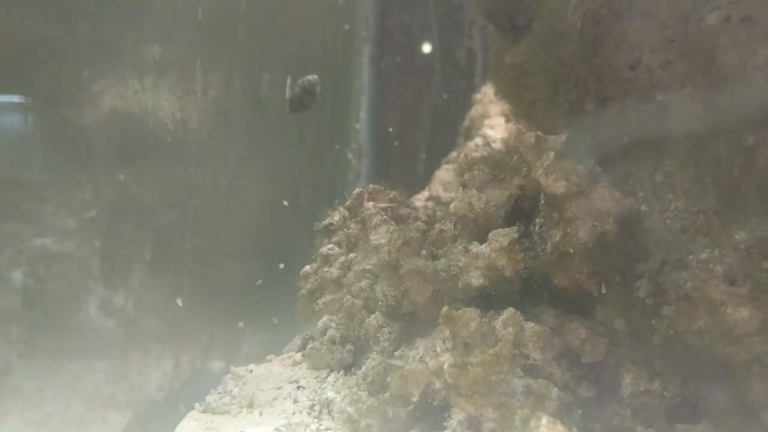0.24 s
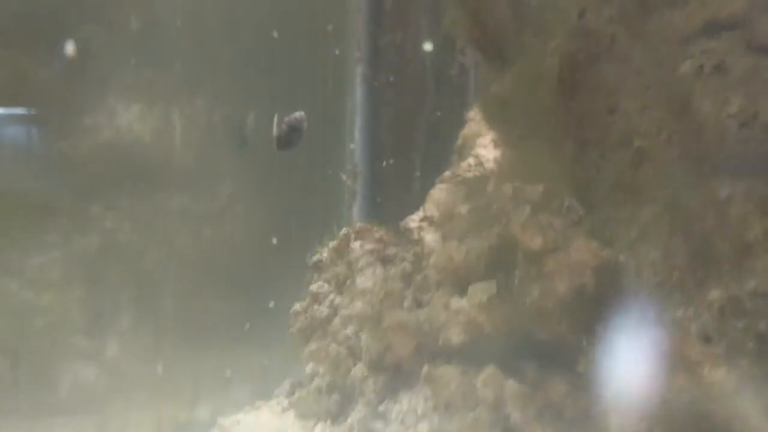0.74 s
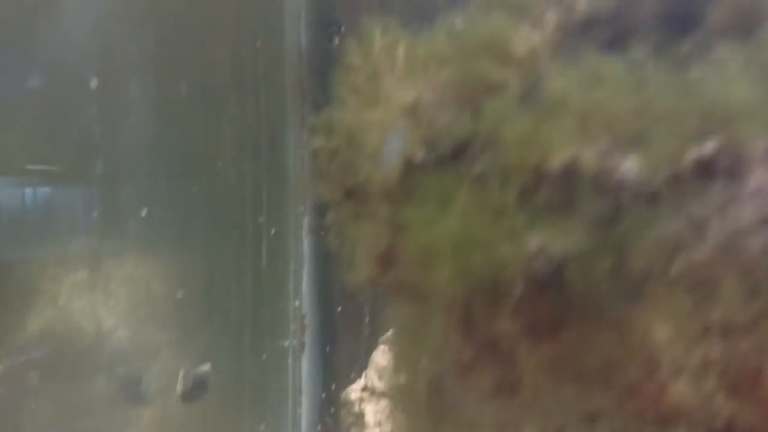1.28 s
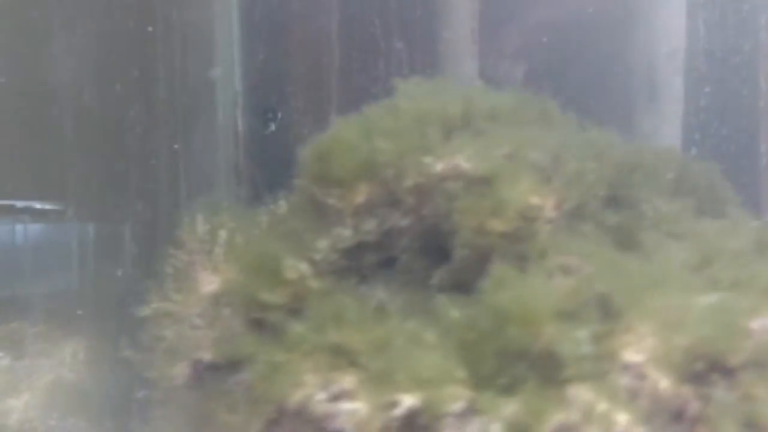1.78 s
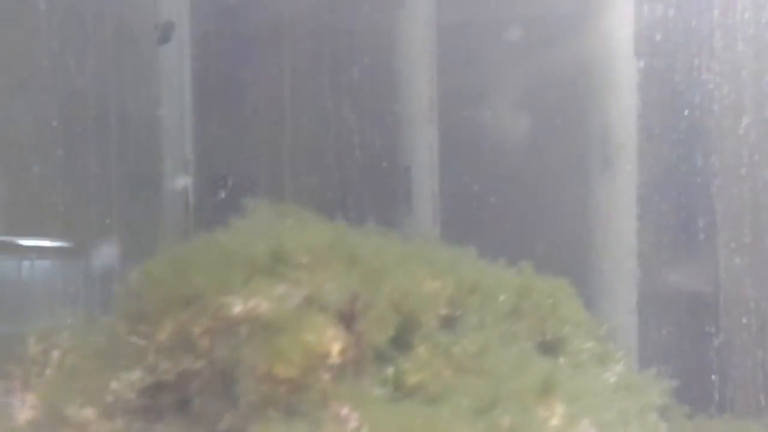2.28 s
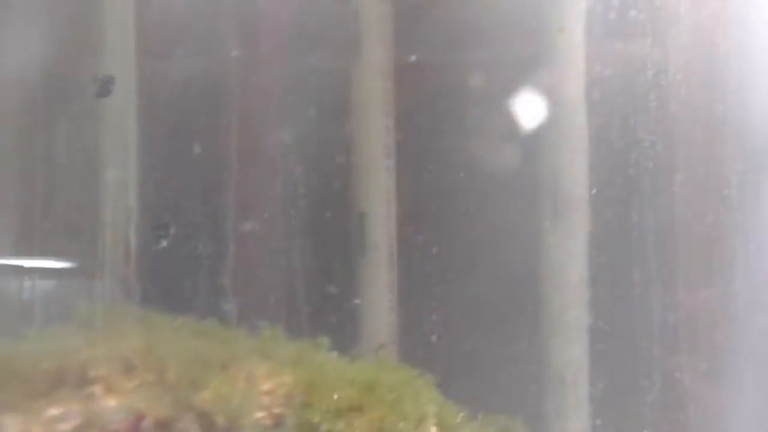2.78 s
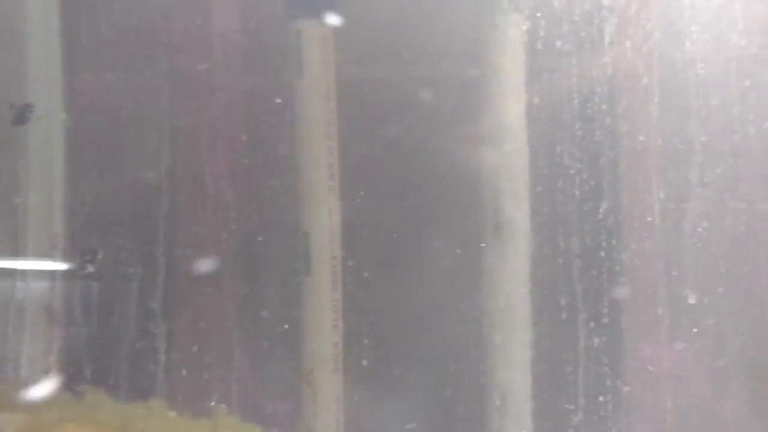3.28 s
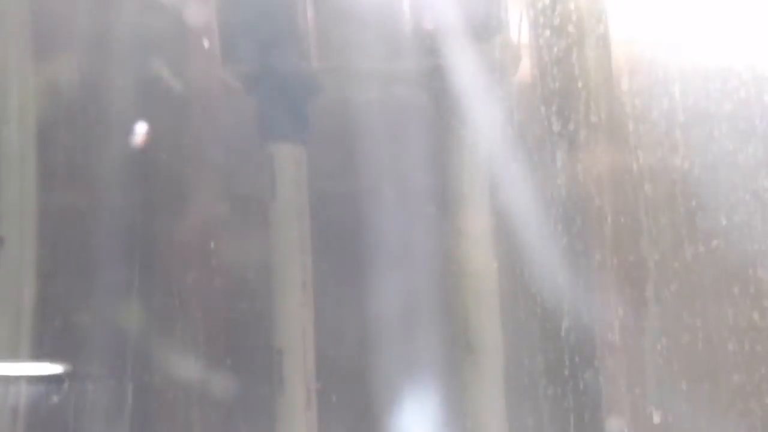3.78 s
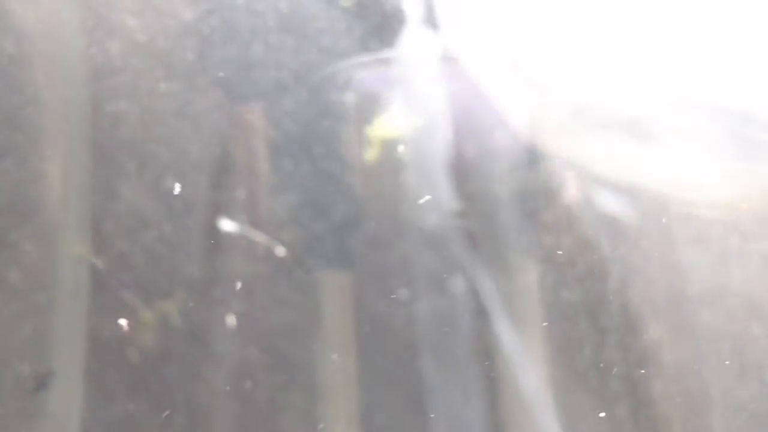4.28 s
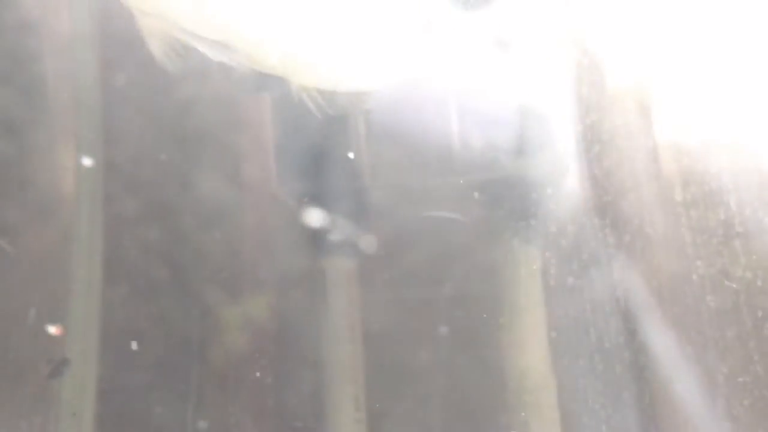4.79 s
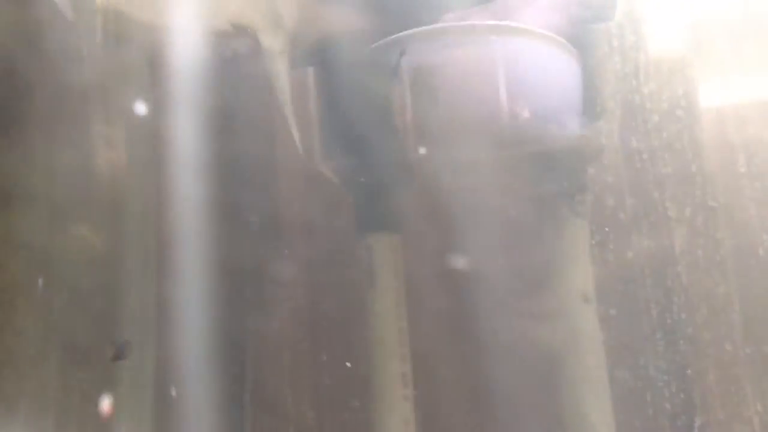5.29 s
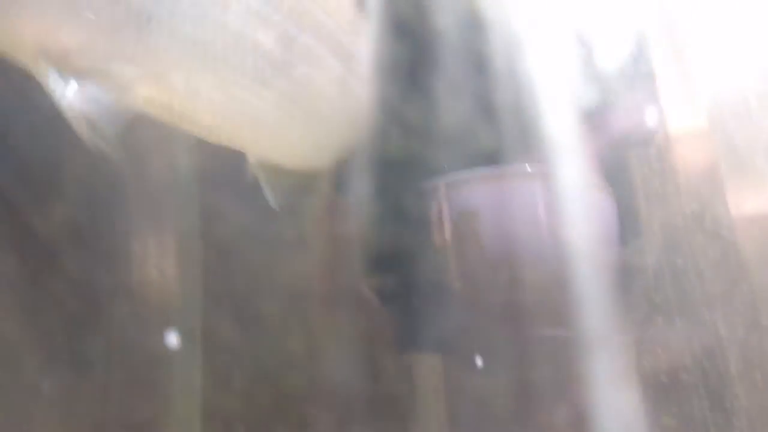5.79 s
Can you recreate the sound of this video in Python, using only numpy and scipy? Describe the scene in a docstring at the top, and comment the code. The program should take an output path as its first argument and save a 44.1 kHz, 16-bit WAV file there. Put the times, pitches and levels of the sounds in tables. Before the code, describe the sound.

Close aquarium outflow burbles and hisses, one sharp knock rings the glass, then a low pump hum swells with squeaky drags along the pane.

```python
"""An aquarium pump hums through the tank glass, heard close by, on a camera that slides up along the pane.
Its tones (sines with chance wavering) swell as the camera closes in; the drags are gliding groans and squeaks.
One sharp knock, a noise crack over decaying tank tones, makes the gain control duck the level.
The outflow burbles and hisses as filtered noise; ringing bubbles, gulps, noise ticks and spitting drips
lie over it, and narrow drones stand in the room air. Two microphone ports hear it in stereo."""
import sys
import numpy as np
from scipy import signal
from scipy.fft import rfft, irfft
from scipy.io import wavfile
from scipy.ndimage import uniform_filter1d

SR = 44100
rng = np.random.default_rng(int(sys.argv[2]) if len(sys.argv) > 2 else 0)


def store_wav(level_fs):
    """Save 16-bit WAV to argv[1]."""
    pcm = np.round(np.clip(np.atleast_2d(level_fs), -1, 1) * 32767)
    wavfile.write(sys.argv[1], SR, pcm.T.astype(np.int16))


N = 266802
TIME = np.arange(N) / SR

# Pump overtones at a buzz strength of 0 dB, before standing waves and port tilt:
# (multiple of the hum, level [dB], unsteady share, level change per buzz strength [dB/dB])
PUMP_OVERTONES = [(2, -44.5, 0.36, 0.82), (3, -45, 0.46, 0.39), (4, -40, 0.11, 1.24),
                  (5, -41.5, 0.13, 1.43), (6, -56, 0.45, 0.22), (7, -49.5, 0.43, 1.7), (8, -58.5, .25, 0.1),
                  (9, -63, 0.36, 0.51), (10, -57, 0.41, 0.53), (11, -57.5, 0.14, 1.7),
                  (12, -60.5, 0.26, 0.7), (13, -65, 0.22, 0.5), (15, -56.5, 0.17, 3.2),
                  (17, -56.5, 0.39, 0.76)]
# Standing waves that the camera drifts through:
# (time [s], width [s], multiple of the hum, swell or dip [dB])
STANDING_WAVES = [(1.52, 0.13, 6, 12.5), (2.08, 0.18, 6, 13.5), (2.52, 0.37, 3, 6.5), (2.7, 0.38, 5, 2),
                  (2.95, 0.6, 4, -2), (3.15, .2, 3, -4), (3.5, .16, 4, 3.5), (3.55, 0.81, 12, 8),
                  (3.75, 0.53, 9, 9), (3.85, 0.14, 3, -19), (4, .2, 2, 5), (4.08, 0.11, 7, 10),
                  (4.1, 0.38, 10, 11.5), (4.25, 0.3, 13, 0), (4.65, 0.56, 11, 5), (5.75, .3, 8, 9)]
# Drones in the room air, at a buzz strength of -12 dB:
# (frequency [Hz], width [Hz], level [dB], lag of the right port [rad])
ROOM_DRONES = [(183.2, 3.2, -46.5, 2.5), (248.4, 1.56, -45.5, 1.5), (347.6, 16, -52, 2), (785, 6, -53, 1.3),
               (838, 9, -53.5, 0.86), (1142, 2.3, -56.5, -1.5), (6000, 110, -68, 4.5)]
# Likeness of the noise at the two ports: (frequency [Hz], likeness [0 to 1])
PORT_LIKENESS = [(50, .4), (130, .9), (260, .3), (600, .65), (1100, .98), (1750, .45), (2080, .99),
                 (2200, .9995), (2480, .9995), (2620, .98), (2900, .55), (3350, .95), (3650, .93),
                 (4100, .5), (4700, .75), (6000, .55), (8000, .5), (12000, .25), (15000, .2)]
# Phase by which the left port leads: (frequency [Hz], lead [rad])
PORT_LEAD = [(0, 0), (1200, .1), (1700, -1.2), (2080, -3), (2170, -3.14), (2500, -3.14), (2620, -3.35),
             (3100, -5.8), (3350, -6.25), (3700, -6.4), (4200, -8.6), (4900, -9.4), (5500, -11.7),
             (6050, -12.2), (6550, -14.2), (7250, -15.4), (9200, -20.6), (11800, -27), (15500, -35)]
# Level difference of the ports: (frequency [Hz], left minus right [dB])
PORT_TILT = [(60, -2), (200, -2.5), (400, -1), (1300, 0), (2600, 0), (3650, -.5), (4050, -4.5),
             (4900, -2.8), (6300, -8), (8000, -7), (15000, -6)]
# Loudest drips at the surface, before the port offset: (time [s], level [dB], centre frequency [Hz])
LOUD_DRIPS = [(.004, -47, 8000), (0.047, -44, 9000), (.286, -47, 8500), (0.33, -43, 6160),
              (.363, -46, 5700), (0.467, -42.5, 8820), (.6, -42, 10900), (.647, -51, 13500),
              (.865, -50, 6000), (.895, -51, 7000), (0.994, -47, 7500), (1.036, -42, 9000)]
# Low gulps of the outflow: (time [s], level [dB], starting pitch [Hz])
OUTFLOW_GULPS = [(0.085, -31, 329), (.165, -36, 347), (.295, -30.5, 348), (.565, -35.5, 327),
                 (.61, -32, 352.3), (0.744, -32.5, 333), (0.999, -36.5, 363), (3.029, -36, 262),
                 (3.11, -38, 300), (3.19, -27.5, 318), (3.22, -34, 670)]
# Camera drags on the pane, before slips, fades and port tilt: (time [s], length [s], groan level [dB],
# squeak level [dB], squeak pitch [Hz], whole glide of the squeak [Hz], upward curl of its ends [Hz])
PANE_DRAGS = [(1.99, 0.258, -33.5, -46.5, 838, -25, 0), (2.655, 0.16, -37, -40, 836, -25, 0),
              (2.865, 0.13, -38, -39, 838, -31, 0), (3.05, 0.146, -41, -39, 832, 58, 35),
              (3.195, 0.08, -40, -40, 802, 54, -6), (3.31, 0.08, -47, -40.5, 845, -5, 3),
              (3.52, 0.183, -47, -50, 838, 36, 10), (3.81, 0.17, -45, -40.5, 860, 78, -4),
              (4.08, 0.138, -42, -47, 866, 58, 0)]
# The knock and its chatter, relative levels:
# (time [s], crack level [dB], ring level [dB], brightness of the ring [dB/octave])
KNOCK_BLOWS = [(1.0725, -11, -30, 0), (1.0745, -3.5, 0, -1), (1.0805, -12, -8, 3), (1.085, -12, -16, 0)]
# Spectrum of the knock's noise: (frequency [Hz], relative level [dB])
KNOCK_SPECTRUM = [(59, -48), (100, -10), (306, 0), (447, -4), (576, -6), (727, -12), (1450, 1), (1950, -12),
                  (2350, -7.5), (3120, -7), (4100, -13.5), (5870, -4.5), (6500, -14), (8800, -5.5),
                  (10600, -22), (12200, -11), (15500, -24)]
# Decay of the knock's room tail: (frequency [Hz], time to fall 60 dB [s])
KNOCK_DECAY = [(200, 0.48), (600, 0.3), (1400, 0.16), (3200, 0.23), (6000, 0.18), (14000, 0.15)]
# Tank tones that the knock rings: (frequency [Hz], relative level [dB], time to fall 60 dB [s])
TANK_MODES = [(246, -8, 0.15), (346.6, -2, 0.18), (450, -20, 0.25), (500, -10, 0.15), (596, 1, 0.11),
              (900, 4, 0.038), (1200, -8.5, 0.1), (1520, -9, 0.082), (2350, -11, .15), (3080, 2, 0.11),
              (3123, 0, 0.071), (3150, -2.5, 0.14), (3300, -13, 0.23), (5500, -18, 0.14),
              (5990, -8.5, 0.11)]
# Spectrum of the burble: (frequency [Hz], relative density [dB per Hz])
BURBLE_SPECTRUM = [(25, -88), (60, -87.5), (100, -75.5), (160, -64.5), (280, -66.5), (335, -62.5),
                   (405, -69.5), (460, -64), (620, -68.5), (820, -68.5), (950, -73), (1500, -75),
                   (2000, -82.5), (3200, -86), (6000, -92.5), (8500, -100), (15200, -109)]
# Treble of the outflow: (time [s], relative level [dB], slope above the pivot [dB/octave])
SPRAY_COURSE = [(0, -52, -6.5), (0.75, -53.5, -5), (1.02, -50, -3.5), (1.25, -54, 1.5), (1.38, -50.5, 1.5),
                (1.48, -51.5, -0.5), (1.62, -46.5, -2), (1.88, -53, 3), (2.08, -47.5, -1),
                (2.38, -54, -0.5), (2.73, -50, -1), (3.0, -54.5, -2.5), (3.2, -52.5, -2), (3.46, -54, -1.5),
                (3.58, -58.5, 0), (3.76, -63, -1.5), (3.97, -54, -9.5), (4.15, -57.5, -5), (4.4, -65, -0.5),
                (4.87, -65, 1), (4.95, -58.5, 2), (5.6, -58.5, -1), (6.04, -70, 3)]
# Spectrum of the hiss: (frequency [Hz], relative density [dB per Hz])
SPRAY_SPECTRUM = [(800, -100), (2200, -81), (3100, -82), (3450, -81), (3750, -86), (4050, -81.5),
                  (4480, -86), (4950, -80.5), (6000, -84), (6800, -82.5), (8500, -85), (11000, -89),
                  (12500, -91), (15200, -93)]

# The camera closes in on the pane, quickly at first, and then stays there.
APPROACH_S, ARRIVE_S, APPROACH_CURVE = 1.26, 3.31, 0.57
# Hum in the glass, away from the pane and against it, before the port offset.
PUMP_HZ, HUM_FAR_DB, HUM_NEAR_DB, HUM_WAVER = 120, -58, -22.5, 0.05
# A slightly faster motor farther off opposes the hum in phase at BEAT_NULL_S.
MOTOR_HZ, MOTOR_DB, BEAT_NULL_S = 124.25, -57, 0.1
# Buzz strength: the approach, then an opening at rest on the pane and a swell in passing the pump.
BUZZ_FAR_DB, BUZZ_NEAR_DB = -15, -4.5
OPEN_S, OPEN_DB = 0.1, 3
PASS_S, PASS_WIDTH_S, PASS_DB = 3.98, 0.4, 2.5
# One overtone throbs quickly.
THROB_ORDER, THROB_HZ, THROB_DEPTH = 4, 12.5, 0.4
# All drags share a groan that bends with the squeak; the hum splits off a lower strand of the squeak.
GROAN_HZ, GROAN_BEND, LOWER_STRAND_DB, SQUEAK_RAGGED = 239, 0.6, -9, 0.33
SCRAPE_DB, SCRAPE_LOW_HZ, SCRAPE_HIGH_HZ = -49.5, 300, 940
TAIL_DB, CRACK_RISE_S = -21.5, 0.0003
SPIKE_DB, SPIKE_WIDTH_S = -10, 0.0003
SPRAY_PIVOT_HZ, SPRAY_PATCH_DB = 6000, 1.8
# Ticks of the surface: mean level over the first second, then a shield that grows with the approach.
CRACKLE_PER_S, CRACKLE_DB, CRACKLE_T60_S, CRACKLE_SPREAD_DB = 50, -58.5, 0.04, 8
CRACKLE_LOW_HZ, CRACKLE_HIGH_HZ, CRACKLE_SHIELD_DB = 5200, 13000, -16
BUBBLE_SPREAD_DB = 8
GULP_T60_S, GULP_RISE_S, GULP_GLIDE_PER_S, GULP_ROUGH = 0.276, 0.011, 0.3, 0.44
DRIP_T60_S, DRIP_RISE_S, DRIP_LOW_HZ = 0.13, 0.0004, 2800
DRIP_BAND = 0.46  # half-width in natural log of frequency
# Chance drips: the level is the highest, relative to the treble's course.
FAINT_DRIPS_PER_S, FAINT_DRIP_DB, FAINT_DRIP_HZ = 7, 0, 11000
STEADY_WIDTH_HZ = 6  # a drone of this width is as steady as it is wavering
# The recorder's gain control and its upper band limit.
DUCK_OVER_DB, DUCK_REACT_S, DUCK_RECOVER_DB_PER_S = -20, 0.045, 18
EDGE_HZ = 15400


def amp(db):
    """Decibels to amplitude."""
    return 10 ** (np.asarray(db) / 20)


def evened(x):
    """The signal scaled to rms 1."""
    return x / np.sqrt(np.mean(abs(x) ** 2) + 1e-20)


def read(points, hz):
    """A spectrum, joined by straight lines on a log-frequency axis."""
    f, value = np.transpose(points)
    return np.interp(np.log(hz + 1), np.log(f + 1), value)


def add(mix, s, sound):
    """Lay a sound into the mix at s seconds, cut off at the end."""
    part = mix[..., round(s * SR):][..., :sound.shape[-1]]
    part += sound[..., :part.shape[-1]]


def waver(width_hz):
    """Slow complex chance of rms about 1: turns a line into a band of about this width."""
    count = 4096
    hz = np.fft.fftfreq(count, TIME[-1] / count)
    chance = rng.standard_normal(count) + 1j * rng.standard_normal(count)
    z = np.fft.ifft(chance / (1 + (hz / width_hz) ** 2))
    return np.interp(TIME, np.linspace(0, TIME[-1], count), evened(z))


def at_ports(x):
    """A single sound from the tank's side, as the two ports hear it: tilted in level, early on the right."""
    hz = np.fft.rfftfreq(N, 1 / SR)
    side = amp(read(PORT_TILT, hz) / 2)
    lag = np.exp(-1j * np.interp(hz, *np.transpose(PORT_LEAD)))
    return irfft(rfft(x) * np.array([side, lag / side]), N)


def port_noise(size):
    """Short-time spectra of noise at the two ports: Hz, s, channels x frames x bins."""
    hop = size // 4
    hz = np.fft.rfftfreq(size, 1 / SR)
    t = np.arange(N // hop + 5) * hop / SR
    a, b, c, d = rng.standard_normal((4, len(t), len(hz)))
    same = np.clip(read(PORT_LIKENESS, hz), 0, .9995)
    left = a + 1j * b
    right = same * left + np.sqrt(1 - same ** 2) * (c + 1j * d)
    right = right * np.exp(-1j * np.interp(hz, *np.transpose(PORT_LEAD)))
    side = amp(read(PORT_TILT, hz) / 2)
    return hz, t, np.array([left * side, right / side])


def to_sound(z):
    """Short-time spectra back to a stereo waveform."""
    size = 2 * (z.shape[-1] - 1)
    return signal.istft(z.transpose(0, 2, 1), nperseg=size, noverlap=size - size // 4)[1][:, :N]


def patches(shape):
    """Chance swells of rms 1, some 35 ms long and 250 Hz wide."""
    over_time = uniform_filter1d(rng.standard_normal(shape), size=6, axis=0)
    return evened(uniform_filter1d(over_time, size=6, axis=1))


def closeness(t):
    """How near the camera is to the pane: 0 away, 1 against it."""
    return np.clip((t - APPROACH_S) / (ARRIVE_S - APPROACH_S), 0, 1) ** APPROACH_CURVE


def hum_level(t):
    """The hum in dB as the camera closes in."""
    return HUM_FAR_DB + (HUM_NEAR_DB - HUM_FAR_DB) * closeness(t)


def buzz_level(t):
    """The strength of the upper buzz in dB: approach, contact, and the pass by the pump."""
    approach = BUZZ_FAR_DB + (BUZZ_NEAR_DB - BUZZ_FAR_DB) * closeness(t)
    resting = np.clip((t - ARRIVE_S) / OPEN_S, 0, 1)
    passing = np.exp(-((t - PASS_S) / PASS_WIDTH_S) ** 2)
    return approach + OPEN_DB * resting + PASS_DB * passing


def standing_wave_db(multiple):
    """One overtone swells and sinks as the camera drifts through its standing waves."""
    return sum(db * np.exp(-((TIME - s) / width) ** 2)
               for s, width, k, db in STANDING_WAVES if k == multiple)


def pump():
    """The motor shakes the glass at twice the mains rate, with unsteady impeller overtones and a beat."""
    turn = 2 * np.pi * PUMP_HZ * TIME
    hum = amp(hum_level(TIME)) * (np.exp(1j * turn) * (1 + HUM_WAVER * waver(12.0))).real
    beat = 2 * np.pi * (MOTOR_HZ - PUMP_HZ) * (TIME - BEAT_NULL_S)
    hum -= amp(MOTOR_DB) * np.cos(turn + beat)
    buzz_db, buzz = buzz_level(TIME), np.zeros(N)
    for k, db, loose, grip in PUMP_OVERTONES:
        throb = 1 + THROB_DEPTH * (k == THROB_ORDER) * np.exp(-2j * np.pi * THROB_HZ * TIME)
        carrier = np.exp(1j * (k * turn + 2 * np.pi * rng.random()))
        line = carrier * evened(throb + loose * waver(18))
        buzz += amp(db + grip * buzz_db + standing_wave_db(k)) * line.real
    return np.sqrt(2) * (hum * amp([[-1.3], [1.2]]) + at_ports(buzz))


def slides(slip_hz=46, slip_depth=0.11, wobble_hz=3, fade_share=0.55):
    """Stick and slip on the pane: a low groan and a scrape under a thin, ragged, gliding squeak."""
    out = np.zeros(N)
    band = signal.butter(2, [SCRAPE_LOW_HZ, SCRAPE_HIGH_HZ], "bandpass", fs=SR, output="sos")
    scrape = amp(SCRAPE_DB) * evened(signal.sosfilt(band, rng.standard_normal(N)))
    for s, length, groan_db, squeak_db, squeak_hz, glide_hz, curl_hz in PANE_DRAGS:
        count = int(length * SR)
        age = TIME[:count]
        rough = 1 + 0.09 * waver(28)[:count]
        slips = 1 + slip_depth * np.cos(2 * np.pi * (slip_hz * age + rng.random()))
        along = np.linspace(-1, 1, count)
        hz = squeak_hz + glide_hz * along / 2 + curl_hz * along ** 2
        hz = hz + wobble_hz * waver(4.5)[:count].real
        lower = amp(LOWER_STRAND_DB) * np.exp(-2j * np.pi * PUMP_HZ * age) * waver(12)[:count]
        ragged = 1 + SQUEAK_RAGGED * waver(30)[:count] + lower
        squeak = amp(squeak_db) * ragged * slips * np.exp(2j * np.pi * np.cumsum(hz) / SR)
        groan_hz = GROAN_HZ * (hz / squeak_hz) ** GROAN_BEND
        groan = amp(groan_db) * np.exp(2j * np.pi * np.cumsum(groan_hz) / SR)
        drag = np.sqrt(2) * (rough * (groan + squeak)).real
        drag = drag + slips * scrape[round(s * SR):][:count]
        add(out, s, signal.windows.tukey(count, fade_share) * drag)
    return at_ports(out)


def knock():
    """A hard blow with a brief chatter: a noise crack, ringing tank modes and a short room tail."""
    hz, t, z = port_noise(size=256)
    z = z * amp(read(KNOCK_SPECTRUM, hz))
    count = SR // 2
    age = TIME[:count]
    tail = to_sound(z * amp(-60 * t[:, None] / read(KNOCK_DECAY, hz)))[:, :count]
    tail *= amp(TAIL_DB) / np.std(tail[:, :SR // 100]) * (1 - np.exp(-age / 0.013))
    grit, out, ring = evened(to_sound(z)), np.zeros((2, N)), np.zeros(N)
    for s, crack_db, ring_db, bright_db in KNOCK_BLOWS:
        crack = amp(-9.0 + crack_db - 60 * age / 0.02) * (1 - np.exp(-age / CRACK_RISE_S))
        add(out, s, crack * grit[:, round(s * SR):][:, :count])
        for mode_hz, db, t60 in TANK_MODES:
            mode = np.sin(2 * np.pi * mode_hz * age) * (1 - np.exp(-age / 0.0016))
            mode_db = -27.0 + ring_db + db + bright_db * np.log2(mode_hz / 1000)
            add(ring, s, amp(mode_db - 60 * age / t60) * mode)
    add(out, KNOCK_BLOWS[1][0], tail)
    # the knock has no deep bass and none of the highest treble
    band = signal.butter(2, [130, 11500], "bandpass", fs=SR, output="sos")
    return signal.sosfilt(band, out + at_ports(ring))


def first_contact():
    """The instant of the knock: one short pressure spike and its undershoot."""
    out, u = np.zeros(N), TIME[:SR // 100] / SPIKE_WIDTH_S
    add(out, KNOCK_BLOWS[1][0], amp(SPIKE_DB) * (1 - u) * np.exp(-u))
    return at_ports(out)


def drips():
    """Each drip throws a short spit of spray, a decaying noise band: listed loud ones, chance faint ones."""
    out, t = np.zeros((2, N)), np.arange(SR // 4) / SR
    hz = np.fft.rfftfreq(len(t), 1 / SR)
    faint = []
    for s, size, pitch in rng.random((int(FAINT_DRIPS_PER_S * TIME[-1]), 3)) * [TIME[-1], 1, 1]:
        db = spray_at(s)[0] + FAINT_DRIP_DB - 6 * size
        faint.append((s, db, FAINT_DRIP_HZ * 2 ** (pitch - .5)))
    for s, db, centre in list(LOUD_DRIPS) + faint:
        band = np.exp(-(np.log((hz + 1) / centre) / DRIP_BAND) ** 2) * (hz > DRIP_LOW_HZ)
        spit = evened(irfft(rfft(rng.standard_normal((2, len(t)))) * band, len(t)))
        fade = amp(db - 60 * t / DRIP_T60_S) * (1 - np.exp(-t / DRIP_RISE_S))
        add(out, s, spit * fade * amp([[-2], [2]]))
    return out


def gulps():
    """Each gulp is one large, wobbling bubble, rising a little in pitch as it dies."""
    out, t = np.zeros((2, N)), np.arange(SR // 4) / SR
    fade = amp(-60 * t / GULP_T60_S) * (1 - np.exp(-t / GULP_RISE_S))
    for s, db, hz in OUTFLOW_GULPS:
        ring = np.exp(2j * np.pi * hz * t * (1 + GULP_GLIDE_PER_S * t))
        ring = ring * (1 + GULP_ROUGH * waver(25)[:len(t)])
        add(out, s, amp(db) * fade * ring.real)
    return out


def water():
    """The outflow's steady, patchy burble of noise; its rumble comes through the glass with the hum."""
    hz, t, z = port_noise(size=1024)
    contact_db = hum_level(t)[:, None] - HUM_NEAR_DB
    # share of the hum's level change that the rumble follows, by frequency
    rumble_db = contact_db * read([(60, 0.024), (150, 0.24), (300, 0.16), (700, 0)], hz)
    field_db = read(BURBLE_SPECTRUM, hz) + rumble_db + 1.88 * patches(z.shape[1:])
    return amp(-38.0) * evened(to_sound(z * amp(field_db)))


def bubbles(per_s=110, level_db=-54):
    """Small bubbles ring as decaying sines and rise in pitch as they near the surface."""
    out, t = np.zeros(N), np.arange(SR // 16) / SR
    for when, pitch, size in rng.random((int(per_s * TIME[-1]), 3)):
        hz = 450 * 14 ** pitch
        fade = np.exp(-t * hz / 18) * (1 - np.exp(-t / 0.0015))
        ring = np.sin(2 * np.pi * hz * t * (1 + 1.4 * t)) * fade
        add(out, when * TIME[-1], amp(BUBBLE_SPREAD_DB * size ** 2 - 12 * pitch) * ring)
    return amp(level_db) * at_ports(evened(out))


def spray_at(t):
    """The relative level and the slope of the treble at these times."""
    s, db, slope = np.transpose(SPRAY_COURSE)
    return np.interp(t, s, db), np.interp(t, s, slope)


def spray():
    """Countless tiny bubbles bursting at the surface, as a bright hiss of shaped, patchy noise."""
    hz, t, z = port_noise(size=1024)
    level_db, slope_db = spray_at(t[:, None])
    level_db = level_db + slope_db * np.maximum(np.log2((hz + 1) / SPRAY_PIVOT_HZ), 0)
    field_db = read(SPRAY_SPECTRUM, hz) + level_db + SPRAY_PATCH_DB * patches(z.shape[1:])
    return amp(-47.5) * evened(to_sound(z * amp(field_db)))


def crackle():
    """Bursting bubbles tick as short noise decays, shielded as the camera closes in on the pane."""
    out, t = np.zeros((2, N)), TIME[:SR // 20]
    for s, size in rng.random((int(CRACKLE_PER_S * TIME[-1]), 2)) * [TIME[-1], 1]:
        db = CRACKLE_SPREAD_DB * size ** 2 + CRACKLE_SHIELD_DB * closeness(s)
        add(out, s, rng.standard_normal((2, len(t))) * amp(db - 60 * t / CRACKLE_T60_S))
    band = signal.butter(7, [CRACKLE_LOW_HZ, CRACKLE_HIGH_HZ], "bandpass", fs=SR, output="sos")
    out = signal.sosfilt(band, out)
    return amp(CRACKLE_DB) * out / np.std(out[:, :SR]) * amp([[-5], [1]])


def room_tones():
    """Narrow drones that reach the ports through the air; the narrower, the steadier."""
    out = np.zeros((2, N))
    for hz, width, db, lag in ROOM_DRONES:
        shared = STEADY_WIDTH_HZ / width + waver(width)
        for channel, phase in zip(out, (0, lag)):
            carrier = np.exp(2j * np.pi * hz * TIME - 1j * phase)
            channel += amp(db) * evened(((shared + .5 * waver(width)) * carrier).real)
    return out * amp(-.65 * (buzz_level(TIME) + 12))  # the pane shields them as the camera closes in


def scene():
    """Sum of the tank's own sounds and those of its water and room."""
    tank = pump() + room_tones() + slides() + knock() + first_contact()
    return tank + water() + spray() + crackle() + bubbles() + gulps() + drips()


def record(dry):
    """Gain control ducks whatever exceeds its threshold and recovers steadily; then the band limit."""
    power = abs(uniform_filter1d((dry ** 2).mean(0), size=180))
    power_db = 10 * np.log10(power + 1e-12)
    fall = TIME * DUCK_RECOVER_DB_PER_S
    held_db = np.maximum.accumulate(power_db + fall) - fall  # peaks held, sinking at the recovery rate
    over_db = np.maximum(held_db - DUCK_OVER_DB, 0)
    lag = np.exp(-1 / (DUCK_REACT_S * SR))
    ducked = dry * amp(-signal.lfilter([1 - lag], [1, -lag], over_db))
    low_pass = signal.firwin(511, EDGE_HZ, window=("kaiser", 9), fs=SR)
    return signal.oaconvolve(ducked, low_pass[None], "same")


dry = scene()
out = record(dry)
store_wav(out)
```